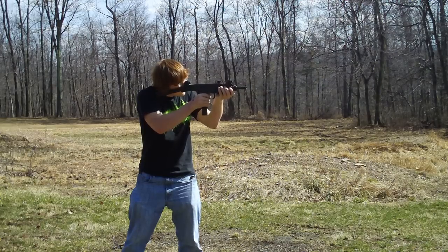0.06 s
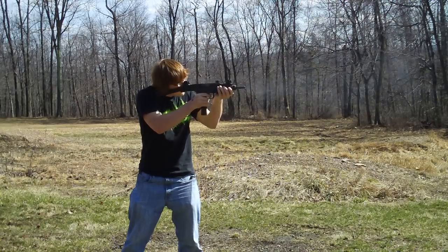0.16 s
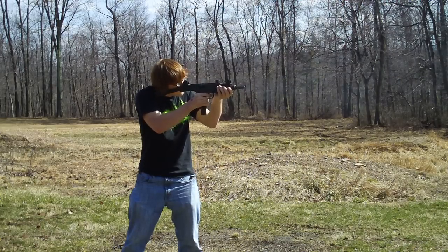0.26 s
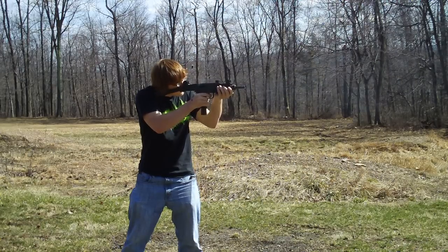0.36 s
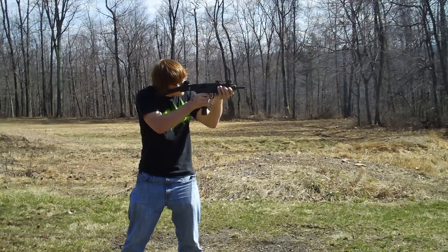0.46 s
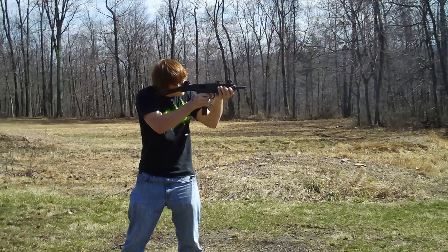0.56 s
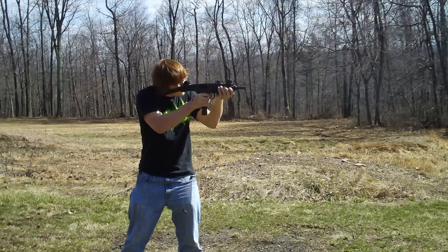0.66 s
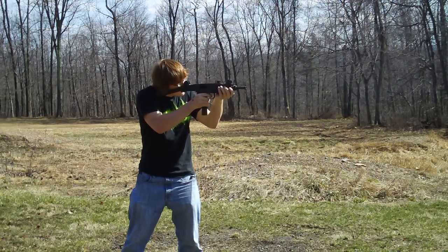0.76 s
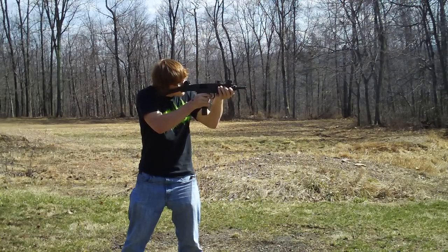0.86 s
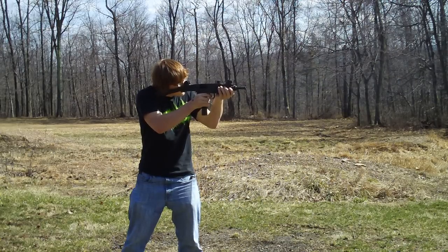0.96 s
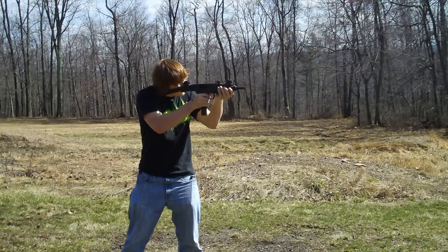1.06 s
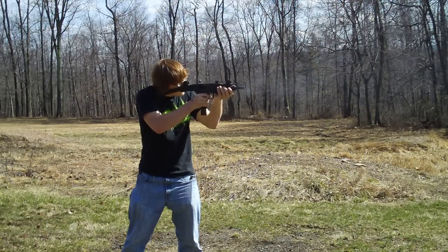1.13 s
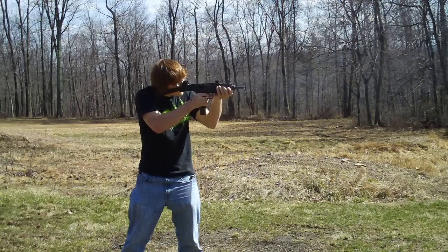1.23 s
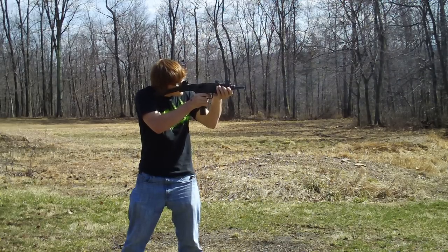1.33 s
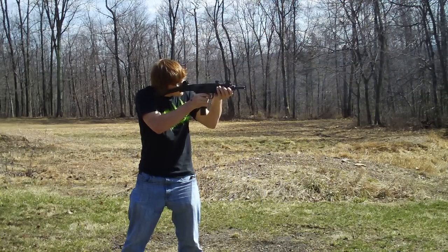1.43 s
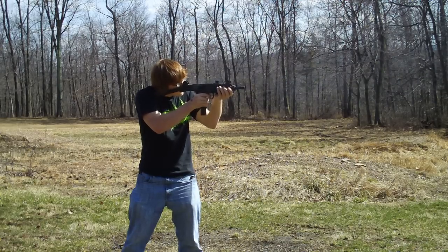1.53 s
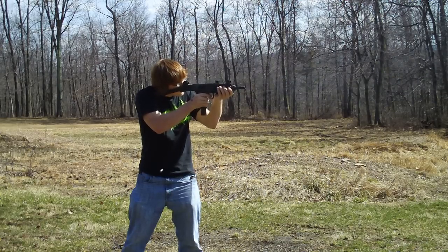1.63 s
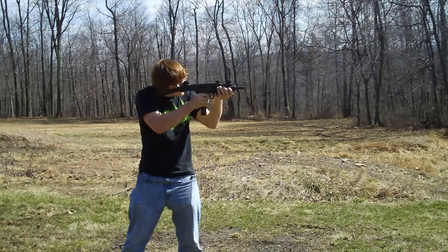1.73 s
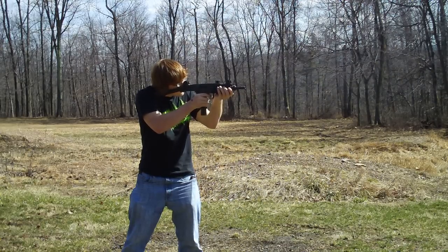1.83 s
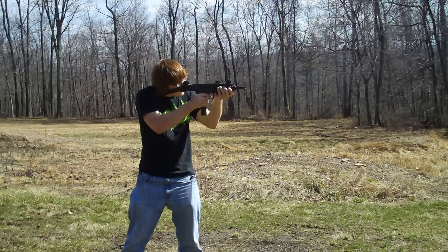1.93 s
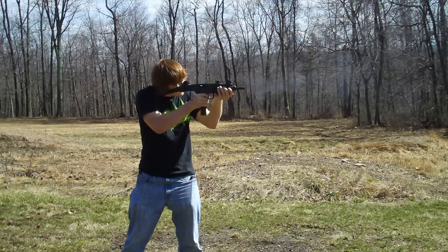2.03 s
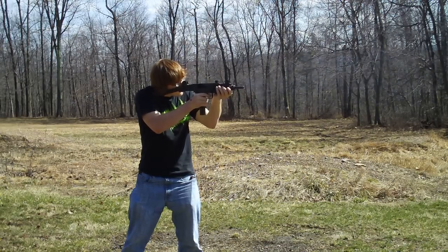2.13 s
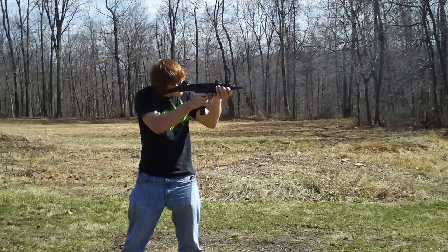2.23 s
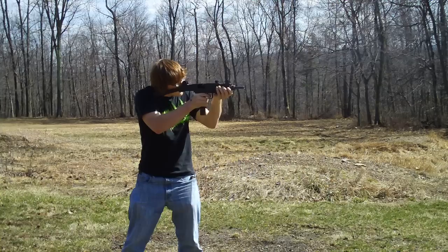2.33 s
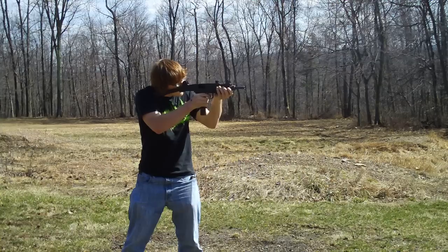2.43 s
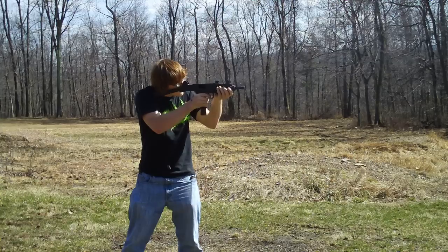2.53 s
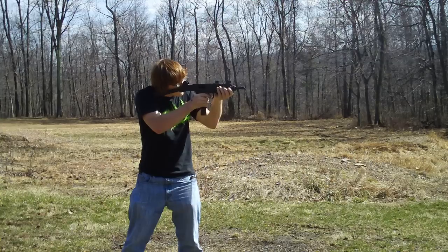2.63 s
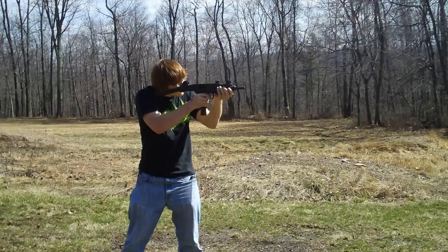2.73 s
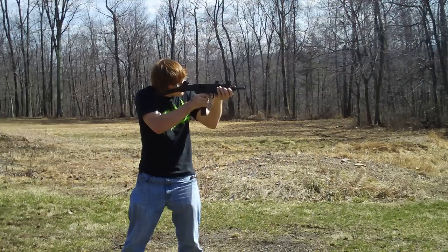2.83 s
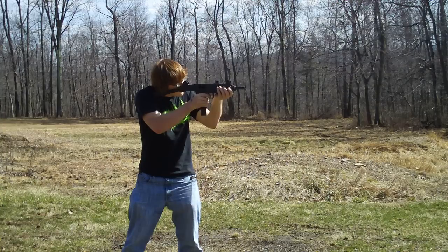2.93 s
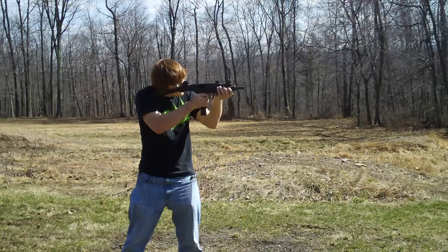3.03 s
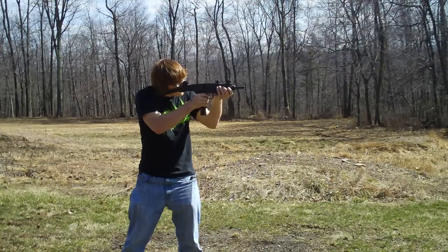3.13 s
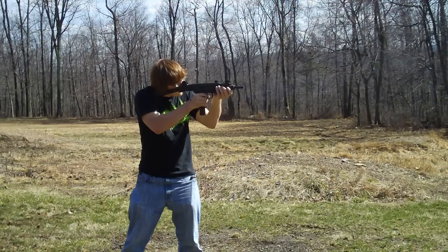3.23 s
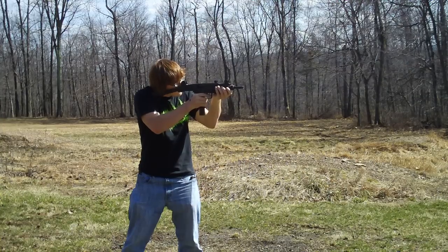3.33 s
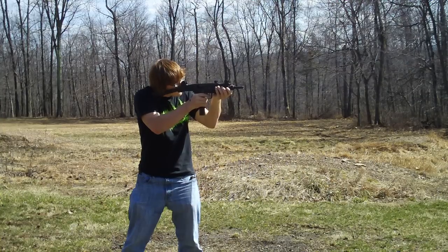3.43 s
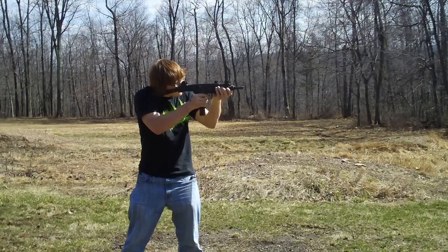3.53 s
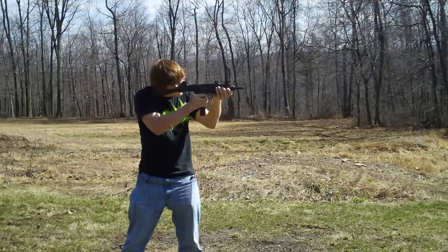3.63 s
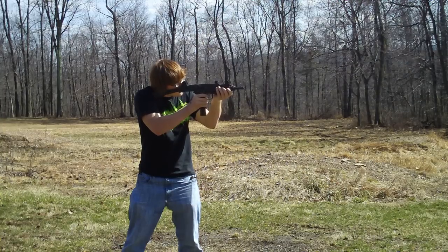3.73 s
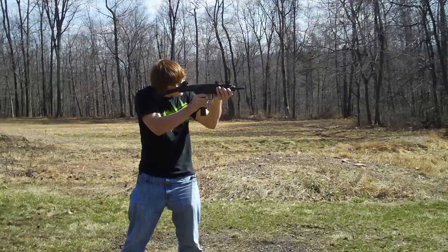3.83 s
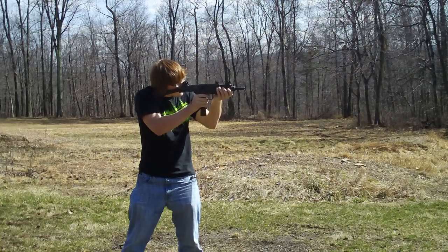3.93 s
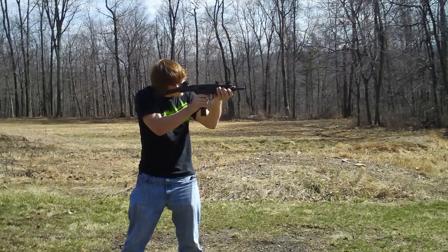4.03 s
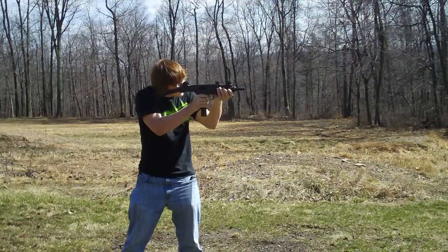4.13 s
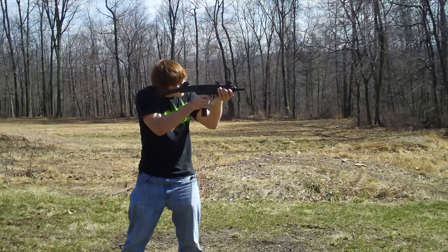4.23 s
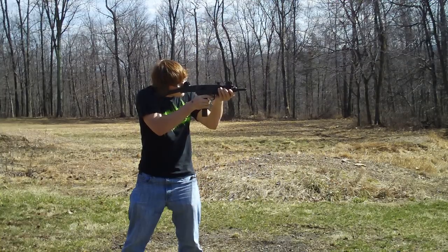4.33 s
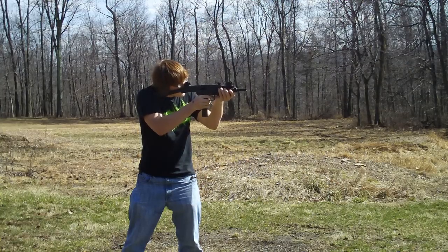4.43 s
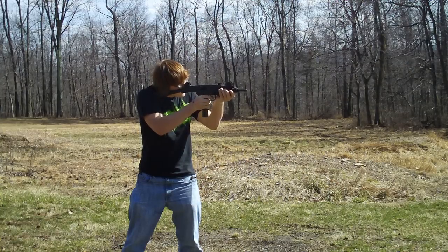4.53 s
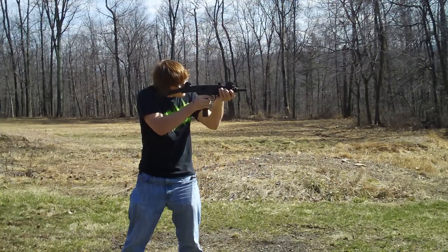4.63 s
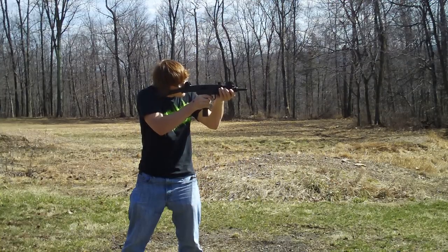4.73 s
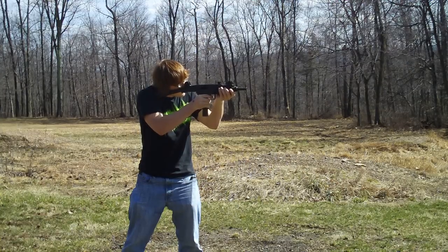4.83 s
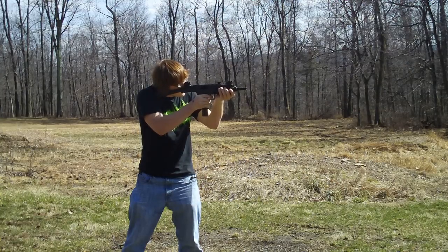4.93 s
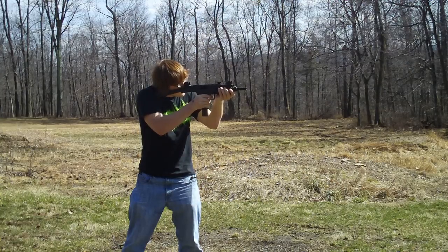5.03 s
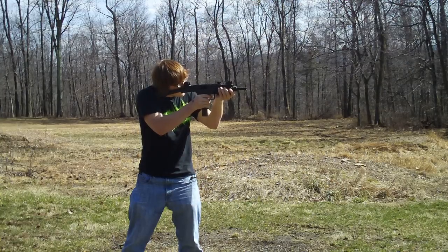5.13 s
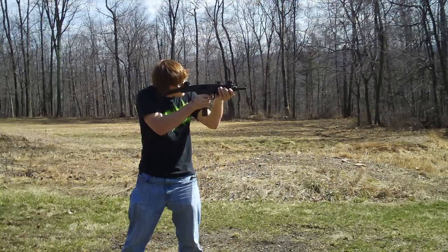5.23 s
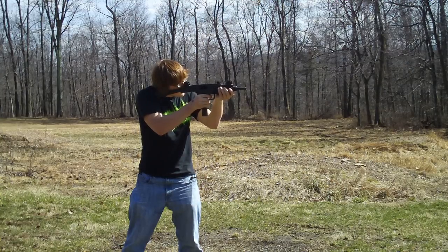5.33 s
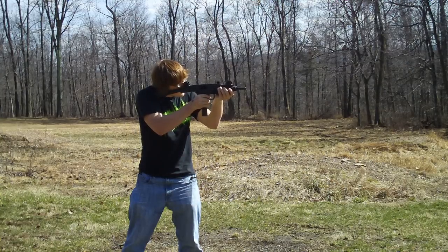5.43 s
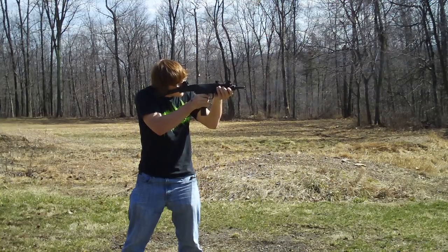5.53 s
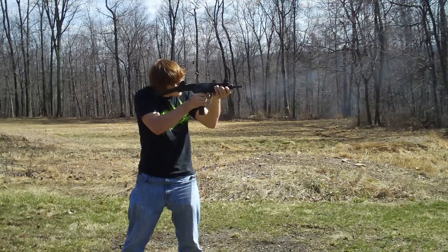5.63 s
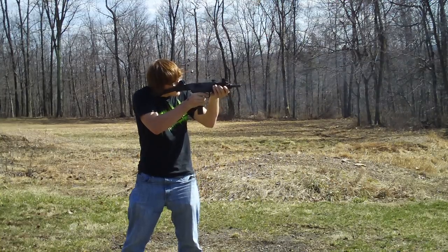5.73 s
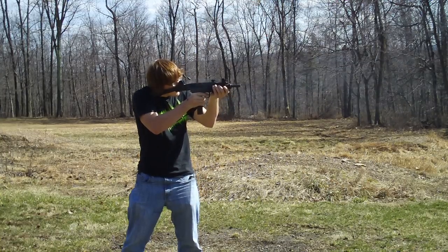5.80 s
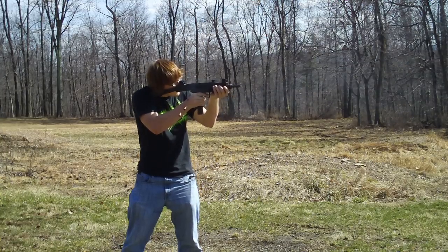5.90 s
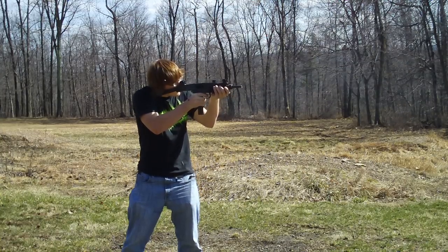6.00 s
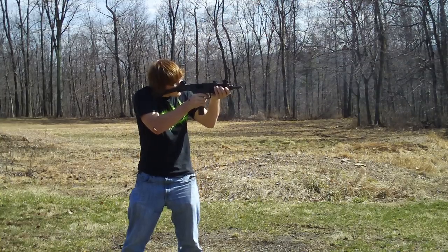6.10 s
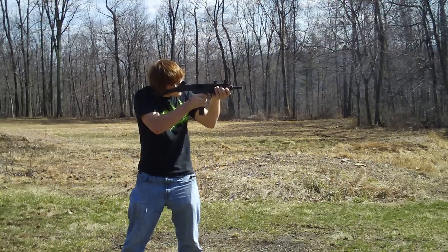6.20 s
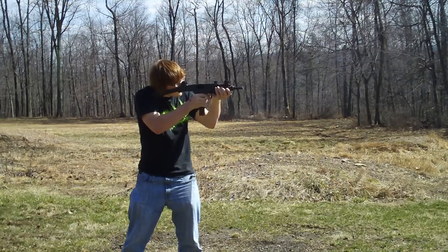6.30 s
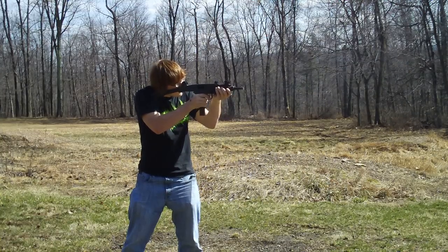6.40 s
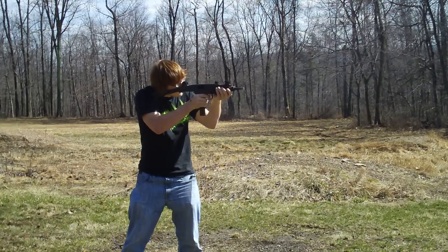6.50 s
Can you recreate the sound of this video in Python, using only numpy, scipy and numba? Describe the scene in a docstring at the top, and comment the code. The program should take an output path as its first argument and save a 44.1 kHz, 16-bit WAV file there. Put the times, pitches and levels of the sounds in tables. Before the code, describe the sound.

Four spaced single gunshots and a rapid three-round burst in a wooded clearing, with ringing steel clangs, long rolling echoes and small metallic clicks.

```python
"""Open-bolt submachine gun in a winter clearing

Four single shots and a burst of three crack out; the bolt clicks and slams ahead of each trigger pull's first blast.
A steel plate rings as struck modes, dry noise cracks follow some shots, and trunks and slopes return noise and echoes.
A small mono camera overloads: it clips, its limiter ducks late and recovers, its input stage swings slowly.
Behind it all lie light metal ticks, a breeze in the deep bass, a steady floor and a faint treble chatter."""
import sys
import numpy as np
from scipy import signal
from scipy.fft import rfft, irfft, next_fast_len
from scipy.io import wavfile
from scipy.ndimage import uniform_filter1d
from numba import njit

SR = 44100
rng = np.random.default_rng(int(sys.argv[2]) if len(sys.argv) > 2 else 0)


def elevation(decibels):
    """Turn decibel levels (scalar or array-like) into linear amplitude ratios."""
    levels = np.asarray(decibels, float)
    return 10 ** (levels / 20)


def transcribe(signal):
    """Save signal, clipped to [-1, 1], as a 16-bit WAV file at the path in sys.argv[1]."""
    frames = np.atleast_2d(signal).T
    limited = np.clip(frames, -1, 1)
    pcm = np.round(limited * 32767).astype(np.int16)
    wavfile.write(sys.argv[1], SR, pcm)


N = 289296
LEAD = SR  # samples rendered before the scene opens
T = np.arange(N + LEAD) / SR
# one millisecond, a short event and the woods' answer, in samples
MS, SHORT, LONG = SR / 1000, 4000, 3 * SR


def colour(x, points):
    """Shapes a spectrum by (Hz, dB) points joined on a log frequency axis."""
    size = next_fast_len(len(x))
    hz, db = np.transpose(points)
    log_hz = np.log(np.maximum(np.arange(size // 2 + 1) * SR / size, 1))
    gain = elevation(np.interp(log_hz, np.log(hz), db))
    return irfft(rfft(x, size) * gain, size)[:len(x)]


def unit(x):
    """Scales to rms 1."""
    return x / np.sqrt(np.mean(x ** 2))


def resonance(x, hz, width):
    """Two-pole band-pass, width in Hz."""
    b, a = signal.iirpeak(min(hz, .45 * SR), hz / width, fs=SR)
    return signal.lfilter(b, a, x)


def add(out, s, sound):
    """Mixes a sound in at a scene time in seconds."""
    i = int(round(s * SR)) + LEAD
    out[i:i + len(sound)] += sound[:len(out) - i]


def fade(t, t60, rise=1e-4):
    """Envelope of a struck thing: a quick exponential rise, then 60 dB of decay per t60."""
    return (1 - np.exp(-t / rise)) * elevation(-60 * t / t60)


# Shots, the first fired before the scene opens: start_s, level_db, swing (signed input-stage amplitude)
SHOT_TIMES = [(-.78, -2, 0), (.2269, 0, 2.5), (1.2178, 0, 9.), (2.1397, 0, -18.), (3.2726, 0, -1.),
              (5.5922, 0, -13.), (5.6636, 0, -5.), (5.7332, 0, .5)]
# Colour of the blast at the microphone: freq_hz, level_db
BLAST_COLOUR = [(40, -2), (200, 0), (1000, 2), (2000, 1), (4000, -4), (6000, -1), (9000, -6), (13000, -6),
                (16000, -14)]
# Colour of the ground scatter right after the blast: freq_hz, level_db
GROUND_COLOUR = [(40, -5), (100, 2), (170, 3), (260, -2), (500, -4), (1500, -3), (3000, -6), (6000, -5),
                 (10000, -6), (15000, -12)]


def shots(alike=.85):
    """Muzzle blasts, far over the camera's range, each answered by nearly the same field."""
    out, t = np.zeros(len(T)), T[:SR // 2]
    same, other, single = woods(grain_db=2.2), woods(grain_db=2.2), echoes()
    for s, db, swing in SHOT_TIMES:
        blast = unit(colour(rng.standard_normal(len(t)), BLAST_COLOUR)) * np.exp(-(t / .005) ** 3)
        ground = unit(colour(rng.standard_normal(len(t)), GROUND_COLOUR)) * fade(t, .27)
        add(out, s, elevation(db) * (elevation(34) * blast + elevation(8) * ground))
        # the muzzle points a little differently each time, so other trunks join in
        aim = rng.standard_normal() * np.arccos(min(alike, 1))
        add(out, s, elevation(db) * (np.cos(aim) * same + np.sin(aim) * other))
        add(out, s, elevation(db) * single)
        # the overloaded input stage kicks as the blast ends, then swings back the other way
        kick = 2.6 * np.exp(-((t - .005) / .0013) ** 2)
        settle = np.exp(-t / .035 - (t / .18) ** 4) * (1 - np.exp(-t / .003))
        add(out, s, swing * (1 - t / .03 + kick) * settle)
    return out


# The woods' answer per band, level at its start: freq_hz, level_db, t60_s
WOODS_BANDS = [(40, -42, 1.), (80, -26, 1.3), (150, -20, 1.4), (300, -20, 2.), (500, -17, 2.4),
               (800, -12, 2.75), (1300, -9, 2.7), (2000, -9.5, 2.05), (3000, -12, 1.7), (5000, -9, 1.05),
               (8000, -10, .8), (13000, -17, .58)]
# Answering trunks, few from the open ground and many from the tree line: delay_s, level_db
TREE_LINE_LEVEL = [(0, 4), (.1, 1), (.13, -2), (.16, -11), (.21, -12), (.26, -5), (.33, -1.5), (.7, -2.5),
                   (2.4, 3)]


def woods(grain_db):
    """Scattered trunks as noise in half-octave bands; air and twigs take the treble early."""
    t = T[:LONG]
    # trunks differ in size; far off so many answer that they blend
    size = np.repeat(np.minimum(rng.exponential(size=LONG // 50), 4), 50)
    trunks = rng.standard_normal(LONG) * elevation(grain_db * np.exp(-t / .8) * size)
    # level out the slow drift, keep the grain
    trunks = trunks / np.sqrt(uniform_filter1d(trunks ** 2, size=SR // 8))
    spectrum = rfft(trunks)
    octave = np.log2(np.maximum(np.arange(len(spectrum)) * SR / LONG, 1))
    hz, db, t60 = np.transpose(WOODS_BANDS)
    out = 0
    for centre in np.arange(5, 14.1, .5):  # log2 of Hz
        window = np.cos(np.pi * np.clip(octave - centre, -.5, .5)) ** 2
        band = unit(irfft(spectrum * window, LONG))
        level = elevation(np.interp(centre, np.log2(hz), db))
        out = out + band * level * fade(t, np.interp(centre, np.log2(hz), t60))
    return out * elevation(np.interp(t, *np.transpose(TREE_LINE_LEVEL)))


# The strongest single reflections: delay_s, level_db, pitch_hz
STRONG_ECHOES = [(.085, -9, 160), (.105, -6, 430), (.1255, 14, 970), (.209, -6, 1030), (.2309, -3, 700),
                 (.2527, -3, 1100), (.2589, -3, 1420), (.2681, 6, 820), (.2943, 3, 1500), (.3285, -4, 1290),
                 (.3434, -1, 1210)]


def echoes(edge=.4, count=12):
    """Single reflections: a few swings at the reflector's pitch, with a hissy edge that narrows with distance."""
    out, t = np.zeros(SR), np.arange(-400, 400) / SR
    # weaker reflections fall at random, scattered around one level and pitch
    place, chance = rng.random(count), rng.standard_normal((count, 2))
    delays_s = np.interp(place, (0, 1), (.3, .52))
    levels_db = -10 + 2.5 * chance[:, 0]
    pitches_hz = 1100 * 2 ** (.25 * chance[:, 1])
    for delay, db, hz in STRONG_ECHOES + list(zip(delays_s, levels_db, pitches_hz)):
        width_hz = 900 / delay
        hiss = resonance(rng.standard_normal(len(t)), 2500, width_hz)
        hiss = unit(resonance(hiss, 2500, width_hz))
        swings = np.exp(-(t * hz / 1.1) ** 2)  # half-length 1.1 periods
        i = int(delay * SR) - len(t) // 2
        out[i:i + len(t)] += elevation(db) * (np.sin(2 * np.pi * hz * t) + edge * hiss) * swings
    return out


# Plate modes; decay_s is 0.8 of the undamped t60, level_db is relative, for a corner hit:
# pitch_hz, decay_s, level_db, nodal_lines_across, nodal_lines_along
PLATE_MODES = [(3648, 0.3, -34.6, 3, 3), (4440, 0.6, -17.4, 1, 5), (5410, 1.0, -14.1, 5, 3),
               (6069, 0.8, -14.1, 5, 1), (6290, 1.3, -28.5, 5, 4), (7354, 0.45, -32.6, 6, 0),
               (7914, 0.6, -19.4, 4, 4), (8362, 0.4, -22.7, 2, 7), (8662, 0.4, -24.1, 1, 6),
               (9732, 0.45, -22.1, 5, 4), (9770, 0.35, -24.9, 6, 2), (10940, 0.35, -17.9, 5, 3),
               (11713, 0.45, -21.3, 4, 6), (12445, 0.38, -29.3, 0, 7), (13810, 0.45, -26.7, 4, 6),
               (14500, 0.3, -20.9, 7, 3), (14757, 0.3, -26.4, 7, 5)]
# Where the first six bullets meet the plate; the swinging mount adds damping:
# crack_db, ring_db, damping_per_s, spot_across (0-1), spot_along (0-1)
PLATE_HITS = [(-40, 13, 0, .36, .401), (12, 12, 1., .36, .401), (10, 9.5, 1.3, .453, .495),
              (12, 15, .8, .118, .145), (12, 14.5, .3, .429, .494), (-15, 21, 3., .049, .094)]


def plate(throb=.45):
    """Lead cracks on steel and the plate rings on; modes with a nodal line near the spot stay quiet."""
    delay_s = .1533  # bullet out and clang back
    out, t = np.zeros(len(T)), T[:SR]
    hz, decay, db, across, along = np.transpose(PLATE_MODES)
    for shot, (crack_db, ring_db, damping, x, y) in zip(SHOT_TIMES, PLATE_HITS):
        phase = 2 * np.pi * rng.random(len(hz))
        size = elevation(db) * np.cos(np.pi * np.round(across) * x) * np.cos(np.pi * np.round(along) * y)
        ring = 0
        for f, d, a, p in zip(hz, decay, size, phase):
            # weaker twins a few hertz to either side make the ring throb
            beat = 1 + throb * np.cos(2 * np.pi * f * t / 700 + 3 * p)
            mode = a * np.sin(2 * np.pi * f * t + p) * beat
            ring = ring + mode * fade(t, 1 / (.8 / d + damping)) * (1 - t)
        crack = resonance(rng.standard_normal(len(t)), 4500, 10000)
        crack = crack * (fade(t, .022) + elevation(-30) * fade(t, .3))
        add(out, shot[0] + delay_s, elevation(ring_db) * ring + elevation(crack_db) * crack)
    return out


# Dry cracks from further off that follow some shots: shot_s, level_db
FAR_STRIKES = [(1.2178, 0), (5.5922, -4), (5.6636, 7), (5.7332, 6)]


def strikes():
    """Strikes on wood or earth further off: broad noise cracks that die at once, without a ring."""
    delay_s = .2083
    out, t = np.zeros(len(T)), T[:SHORT]
    for s, db in FAR_STRIKES:
        crack = unit(resonance(rng.standard_normal(len(t)), 2500, 7000))
        add(out, s + delay_s, elevation(db) * crack * fade(t, .006))
    return out


# Trigger pulls: release_s, level_db, slack_db (the trigger taking up slack)
TRIGGER_PULLS = [(.172, 1, -42), (1.1608, 0, -42), (2.0837, 0, -44), (3.2151, 0, -45), (5.5353, -4, -60)]
# What the gun rings with: pitch_hz, width_hz, level_db
GUN_RESONANCES = [(2350, 500, -6), (4100, 400, -3), (5300, 400, -5), (6360, 350, -2), (9290, 900, -6),
                  (10800, 800, -6), (12600, 500, -4), (14600, 900, -8)]
# Release, stripping a round, slam: after_release_s, level_db, rise_ms, t60_s, favoured_hz
BOLT_CONTACTS = [(0, -25, .6, .06, 12600), (.0305, -20, .5, .06, 5300), (.042, -9, 3., .032, 6360)]


def action():
    """The bolt is let go, strips a round and slams home; short rattles through the gun's resonances."""
    favour_db, favour_octaves = 6, .15  # boost of resonances near the favoured pitch
    out, t = np.zeros(len(T)), T[:SHORT]
    for s, pull_db, _ in TRIGGER_PULLS:
        for after, db, rise_ms, t60, favoured in BOLT_CONTACTS:
            rattle = rng.standard_normal(len(t))
            ring = .8 * rattle
            for hz, width, mode_db in GUN_RESONANCES:
                boost = favour_db * np.exp(-(np.log2(hz / favoured) / favour_octaves) ** 2)
                ring = ring + elevation(mode_db + boost) * unit(resonance(rattle, hz, width))
            add(out, s + after, elevation(db + pull_db) * ring * fade(t, t60, rise_ms / 1000))
    return out


# Light ticks of metal being handled or falling, the last one the trigger taking up slack before the final pull:
# start_s, level_db, pitch_hz
METAL_TICKS = [(2.8944, -50, 13000), (3.7394, -38, 12500), (3.9544, -48, 11500), (4.0597, -26, 10700),
               (4.2667, -47, 9500), (4.2941, -49, 7000), (4.3121, -51, 10200), (4.4204, -51, 6200),
               (4.5526, -53, 5200), (4.5735, -44, 6200), (5.5164, -50, 7430)]
# Two slack ticks ahead of each release: offset_s
SLACK_OFFSETS = (-.041, -.028)


def ticks():
    """Trigger slack and loose metal: bright broad clicks of noise around a pitch."""
    out, t = np.zeros(len(T)), T[:SHORT]
    slack = [(s + before, db, 7000) for s, _, db in TRIGGER_PULLS for before in SLACK_OFFSETS]
    for s, db, hz in slack + METAL_TICKS:
        noise = rng.standard_normal(len(t))
        click = unit(resonance(noise, hz, .2 * hz)) + .8 * unit(resonance(noise, 7000, 12000))
        add(out, s, elevation(db) * click * fade(t, .04))
    return out


def wind():
    """A light breeze flutters on the microphone: deep bass noise under a wandering level."""
    level_db, gust_db, gusts_per_s = -55, 5, 6
    hold = int(SR / gusts_per_s)
    gust = np.repeat(rng.standard_normal(len(T) // hold + 1), hold)
    gust = uniform_filter1d(gust, hold)[:len(T)]
    flutter = resonance(resonance(rng.standard_normal(len(T)), 18, 30), 18, 40)
    return elevation(level_db + gust_db * gust) * unit(flutter)


# Colour of the steady floor: freq_hz, level_db
FLOOR_COLOUR = [(20, 0), (55, 0), (140, -6), (300, -11), (1000, -24), (2500, -37), (5000, -42),
                (10000, -40), (15000, -40)]
# A faint treble chatter inside the camera: freq_hz, width_hz, level_db
CHATTER_BANDS = [(8630, 900, -59), (11300, 1600, -64), (13000, 1000, -71), (15000, 300, -72)]


def background(scatter_db=5.):
    """Steady noise floor, and a chatter of short puffs about ten milliseconds apart, uneven in size."""
    floor = unit(colour(rng.standard_normal(len(T)), FLOOR_COLOUR)) * elevation(-50)
    slots = np.arange(MS * 5, len(T) - MS * 5, MS * 10.2)
    chance = rng.standard_normal((len(slots), 2))
    starts = (slots + MS * np.clip(2 * chance[:, 0], -4, 4)).astype(int)
    puffs = np.zeros(len(T))
    puffs[starts] = elevation(scatter_db * chance[:, 1])
    gate = .45 + unit(signal.fftconvolve(puffs, fade(T[:SHORT], .03, .0006))[:len(T)])
    noise = gate * rng.standard_normal(len(T))
    chatter = sum(elevation(db) * unit(resonance(noise, hz, width)) for hz, width, db in CHATTER_BANDS)
    return floor + chatter


def scene():
    """All sources at one microphone, the same in both channels."""
    mono = shots() + plate() + strikes() + action() + ticks() + wind() + background()
    mono = mono[LEAD:]
    return np.array([mono, mono])


@njit
def follow(x, attack, release):
    """Peak follower with a quick rise and a slow fall, one sample behind."""
    e, out = 0., np.empty(len(x))
    for i in range(len(x)):
        out[i] = e
        a = abs(x[i])
        e += (a - e) * (attack if a > e else release)
    return out


def band_limit(x):
    """A steep low-pass at the top of the band."""
    return signal.sosfilt(signal.butter(12, 15800, fs=SR, output="sos"), x)


def record(dry):
    """The limiter ignores the deepest bass and acts a few milliseconds late, so fronts clip before the gain drops."""
    attack_s, release_s, threshold = .008, .04, .37
    bass_cut = signal.butter(2, 80, "high", fs=SR, output="sos")
    sensed = signal.sosfilt(bass_cut, dry[0])
    peak = follow(sensed, 1 / (attack_s * SR), 1 / (release_s * SR))
    gain = np.minimum(1, threshold / (peak + 1e-9)) ** .95
    clipped = np.clip(dry * gain, -1.1, 1.1)
    treble_cut = signal.ellip(8, .2, 45, 15200, fs=SR, output="sos")
    mix = np.clip(signal.sosfilt(treble_cut, clipped), -1, 1)
    return band_limit(mix)


dry = scene()
out = record(dry)
transcribe(out)
```